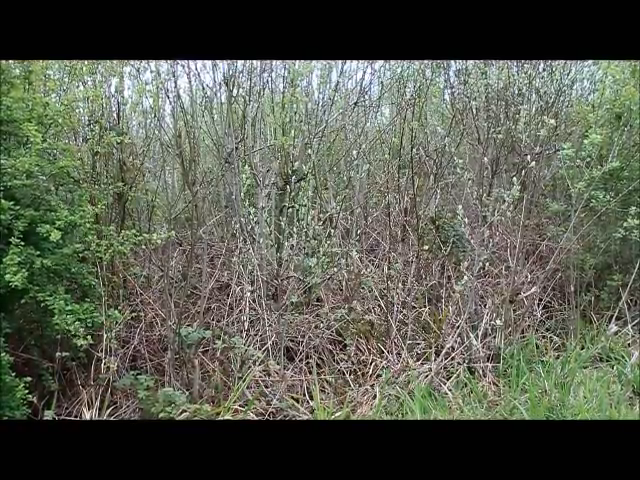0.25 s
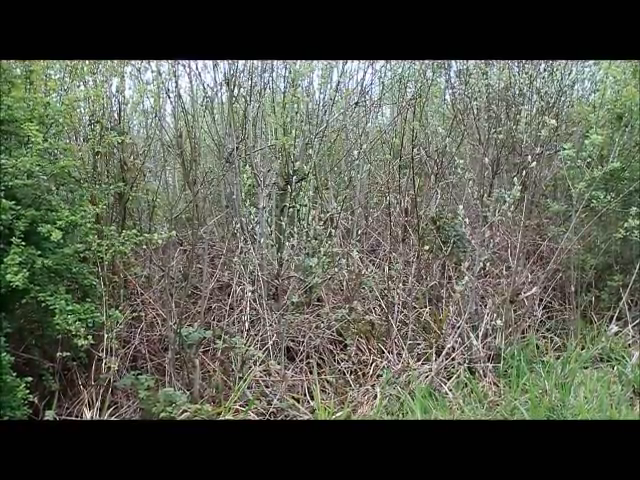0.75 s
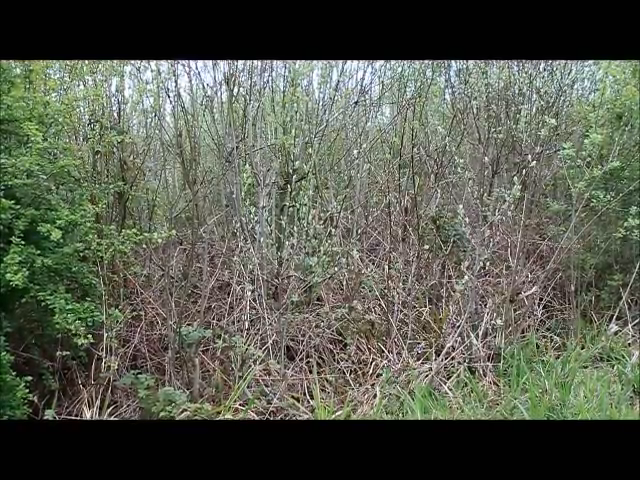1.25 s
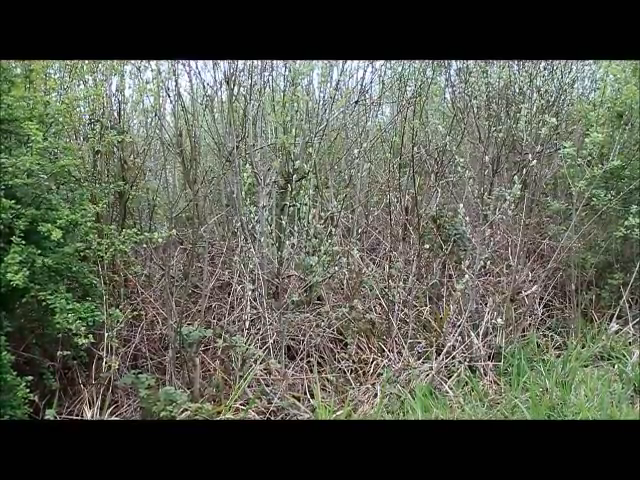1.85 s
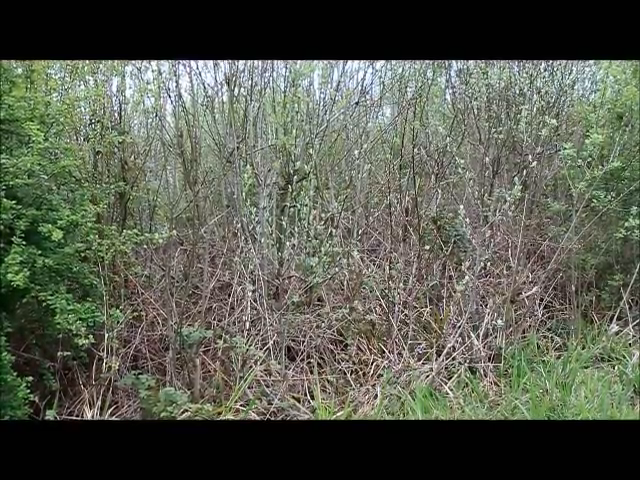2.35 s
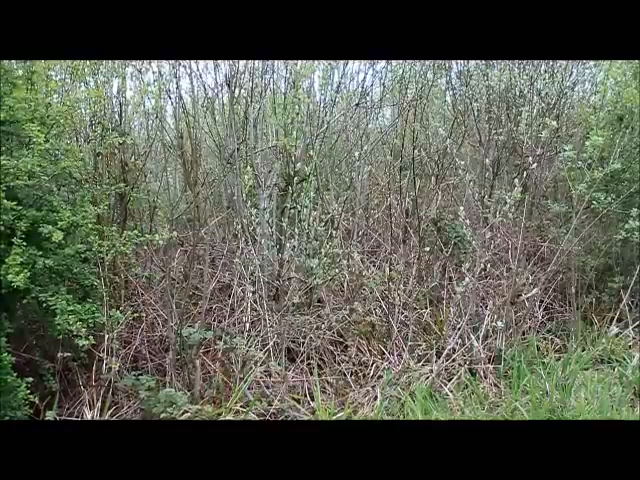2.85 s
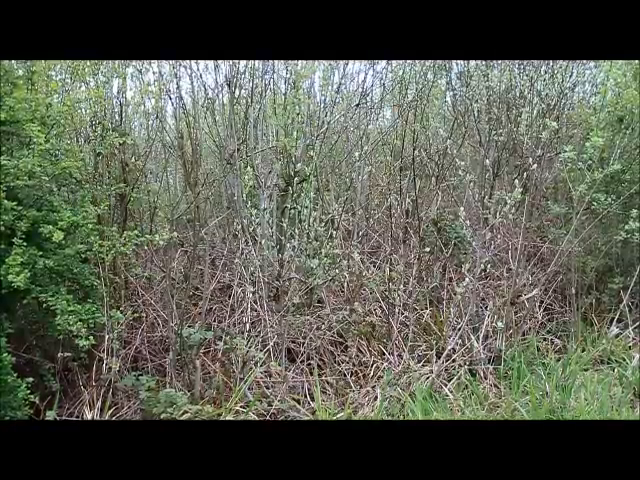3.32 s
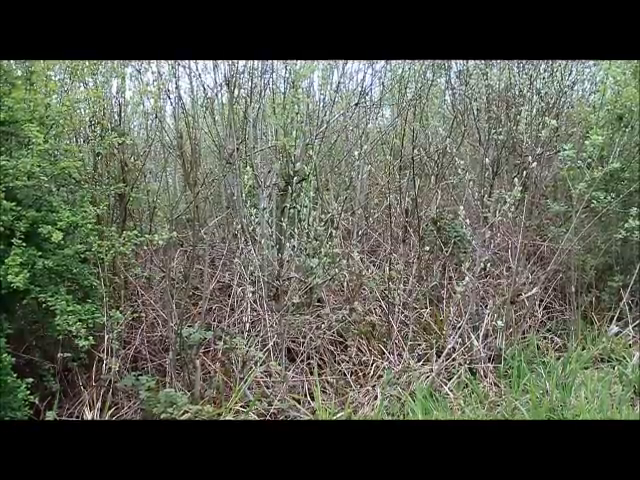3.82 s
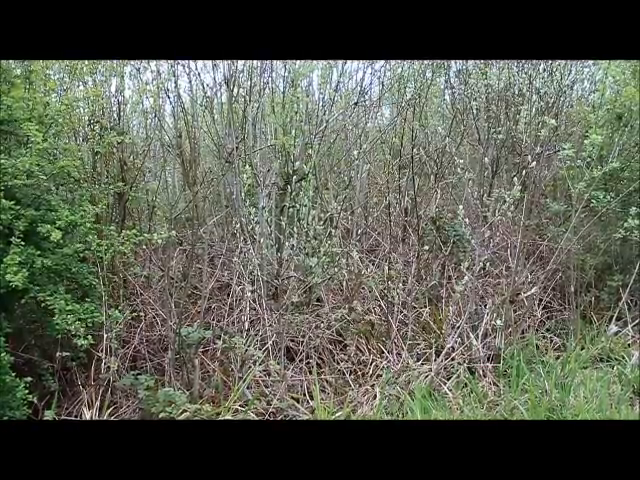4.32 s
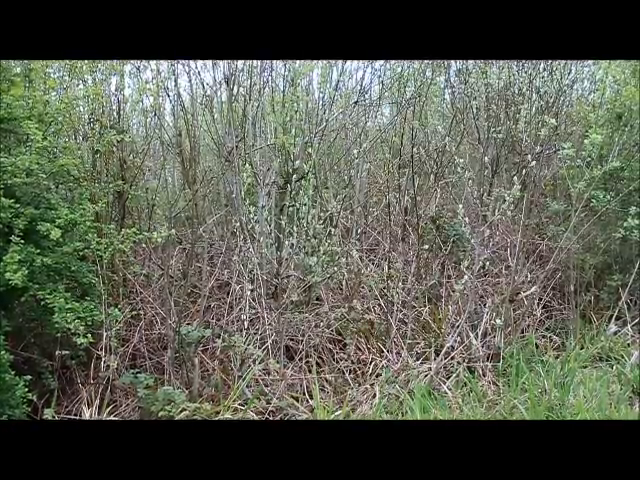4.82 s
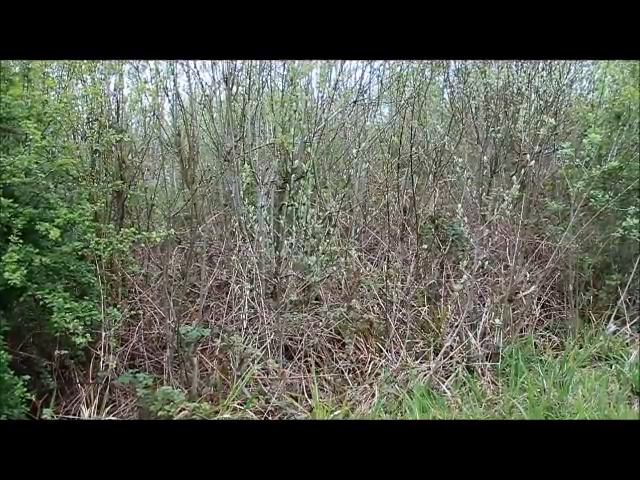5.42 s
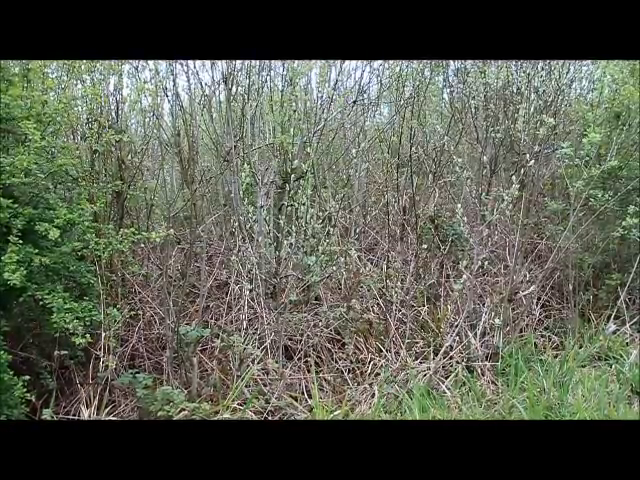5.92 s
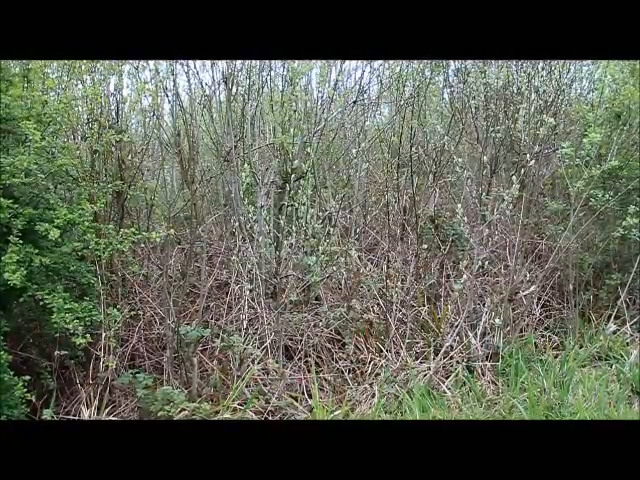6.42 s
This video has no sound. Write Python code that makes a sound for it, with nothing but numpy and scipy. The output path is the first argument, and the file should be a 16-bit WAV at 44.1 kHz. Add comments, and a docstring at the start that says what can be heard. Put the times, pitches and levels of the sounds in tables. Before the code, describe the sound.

Loud, clear nightingale phrases in scrub, from slurs and rasping buzzes to sharp fast chips and soft whistles, with fainter birds behind.

```python
"""Thin opening notes of a nightingale, then seven upslurs alternating with buzzes, thirteen fast
plunging notes and mellow whistles; other birds sing deeper in the wood, over a steady distant
rush and a low hum that fades. Song is near-sines gliding along paths of (s, Hz, dB), buzzes add
pulsed noise, twigs and trunks are random echo taps, and the rush is shaped noise."""
import sys
import numpy as np
from scipy import signal
from scipy.fft import rfft, irfft, next_fast_len
from scipy.io import wavfile
from scipy.ndimage import uniform_filter1d

SR = 44100
rng = np.random.default_rng(int(sys.argv[2]) if len(sys.argv) > 2 else 0)


def log_audio(samples):
    """Write samples as a 16-bit WAV file to the path given in sys.argv[1]."""
    # one column per channel
    frames = np.atleast_2d(samples).T
    # limit to full scale, then quantise
    limited = np.clip(frames, -1, 1)
    pcm = np.round(limited * 32767).astype(np.int16)
    wavfile.write(sys.argv[1], SR, pcm)


N = 294147
TIME = np.arange(N) / SR


def amp(db):
    """Decibels to gain."""
    return 10 ** (np.asarray(db) / 20)


def unit(x):
    """Scales to rms 1."""
    return x / np.sqrt(np.mean(x ** 2) + 1e-20)


def read(points, hz):
    """Interpolates (position, value) rows on a log axis."""
    position, value = np.transpose(points)
    return np.interp(np.log(hz + 1), np.log(position + 1), value)


def level(rows):
    """Turns (s, dB) rows into a gain for every sample."""
    return amp(np.interp(TIME, *np.transpose(rows)))


def add(mix, start_s, sound):
    """Mixes a sound in; a start before zero is moved to zero."""
    part = mix[max(0, round(start_s * SR)):][:len(sound)]
    part += sound[:len(part)]


def beats(first_s, spacing_s, count):
    """The start times of an evenly repeated note."""
    return first_s + spacing_s * np.arange(round(count))


def noise(spectrum):
    """Steady noise of rms 1, coloured by (Hz, dB) rows."""
    size = next_fast_len(N, real=True)
    colour = amp(read(spectrum, np.fft.rfftfreq(size, 1 / SR)))
    white = rfft(rng.standard_normal(size))
    return unit(irfft(white * colour, size)[:N])


def highpass(order, corner_hz):
    """Butterworth high-pass sections."""
    return signal.butter(order, corner_hz, "high", fs=SR, output="sos")


def wander(size, hz):
    """A random line through unit-variance normal knots, hz knots a second."""
    t = np.arange(size) / SR * hz
    knots = rng.standard_normal(int(t[-1]) + 2)
    return np.interp(t, np.arange(len(knots)), knots)


def note(path, jitter=.003, overtone_db=-40):
    """One side of the syrinx: a near sine with a faint octave, gliding along rows of (s, Hz, dB)."""
    s, hz, db = np.transpose(path)
    s = np.sort(s)
    t = s[0] + np.arange(max(int((s[-1] - s[0]) * SR), 64)) / SR
    smooth_samples = min(len(t) // 12, 240)
    pitch_hz = uniform_filter1d(np.interp(t, s, hz), size=smooth_samples, mode="nearest")
    shaken_hz = pitch_hz * (1 + jitter * wander(len(t), 700))
    phase = 2 * np.pi * np.cumsum(shaken_hz) / SR
    overtone = amp(overtone_db) * np.sin(2 * phase) * (pitch_hz < SR / 4)  # none above Nyquist
    edges = np.clip(np.minimum(t - t[0], t[-1] - t) / 0.00027, 0, 1)
    return s[0], amp(np.interp(t, s, db)) * edges * (np.sin(phase) + overtone)


# swell and fade of a whistle: shares of its length; dB at its ends
ATTACK, RELEASE, EDGE_DB = 0.19, 0.22, -7.5


def swell(u):
    """Attack, hold and release of a whistle in dB; u runs from 0 to 1."""
    attack = np.maximum(1 - u / ATTACK, 0)
    release = np.maximum(1 - (1 - u) / RELEASE, 0)
    return EDGE_DB * (attack + release)


def arched(start_s, length_s, first_hz, middle_hz, last_hz, level_db):
    """The path of a whistle whose pitch bends along one parabola."""
    u = np.linspace(0, 1, num=120)
    bow_hz = middle_hz - (first_hz + last_hz) / 2
    hz = first_hz + u * (last_hz - first_hz) + bow_hz * (1 - (2 * u - 1) ** 2)
    return np.transpose([start_s + u * length_s, hz, level_db + swell(u)])


def glide(start_s, length_s, first_hz, last_hz, level_db):
    """The path of a straight glide that swells and fades."""
    u = np.linspace(0, 1, num=9)
    hz = first_hz + u * (last_hz - first_hz)
    return np.transpose([start_s + u * length_s, hz, level_db - 7 * (2 * u - 1) ** 4])


def placed(path, start_s, length_s, level_db):
    """Stretches a (share of length, Hz, dB) path over a length, at a level."""
    return np.array(path) * [length_s, 1, 1] + [start_s, 0, level_db]


def hooked(dip_s, fall_s, arch_s, first_hz, dip_hz, top_hz, fall_db, dip_db, arch_db,
           steepen=1.6, turn=.8, sag_db=-7.5):
    """The path of a whistle that falls into a dip, then lifts into a fading arch."""
    u = np.linspace(0, 1, num=30)
    t = np.concatenate([fall_s * (u - 1), arch_s * u])
    fall_hz = first_hz + (dip_hz - first_hz) * u ** steepen
    arch_hz = dip_hz + (top_hz - dip_hz) * np.sin(np.pi * turn * u ** 0.804)
    times = [-fall_s, -fall_s / 2, -RELEASE * fall_s, 0,
             ATTACK * arch_s, (1 - RELEASE) * arch_s, arch_s]
    levels = [fall_db + EDGE_DB, fall_db, fall_db, dip_db,
              arch_db, arch_db + sag_db, arch_db + sag_db + EDGE_DB]
    return np.transpose([dip_s + t, np.concatenate([fall_hz, arch_hz]), np.interp(t, times, levels)])


# warbled whistle: start_s, length_s, first_hz, middle_hz, last_hz, level_db
WARBLED_WHISTLE = (6.172, 0.19, 2102, 2255.5, 2191, -19.5)


def warbled(rate_hz=50, depth_hz=190, widest_s=6.229, spread_s=0.033, start_db=-11, grow_s=0.12,
            break_db=-13, waver_hz=35):
    """The path of a whistle that shakes and drops out on each upswing, then steadies as it grows loud."""
    s, hz, db = arched(*WARBLED_WHISTLE).T
    phase = 2 * np.pi * rate_hz * (s - widest_s)
    unrest = np.exp(-((s - widest_s) / spread_s) ** 2)
    waver = waver_hz * unit(uniform_filter1d(rng.standard_normal(len(s)), size=9))
    breaks = break_db * unrest * np.maximum(-np.sin(phase), 0)
    growth = start_db * np.maximum(1 - (s - s[0]) / grow_s, 0)
    return np.transpose([s, hz + depth_hz * unrest * np.cos(phase) + waver, db + breaks + growth])


def peaked(top_s, level_db, top_hz=8100, low_hz=3500, rise_s=.010, fall_s=.038, top_db=-16,
           upstroke_db=-7, bend=1.3, shake_hz=122, depth_hz=430, shake_db=3):
    """The path of a thin note that shoots up softly, then slides down louder and shaking more."""
    t = np.linspace(-rise_s, fall_s, num=120)
    early, late = np.maximum(-t / rise_s, 0), np.maximum(t / fall_s, 0)
    height = np.where(t < 0, 1 - early ** 2, (1 - late) ** bend)
    shake = np.minimum(2 * late ** 2, 1) * np.cos(2 * np.pi * shake_hz * t)
    hz = low_hz + (top_hz - low_hz) * height + depth_hz * shake
    db = level_db + top_db * (1 - late) + upstroke_db * early ** 2
    db = db + swell(np.maximum(late, ATTACK)) / 2 + shake_db * shake
    return np.transpose([top_s + t, hz, db])


# arched whistles: start_s, length_s, first_hz, middle_hz, last_hz, level_db
ARCHED_WHISTLES = [(0, 0.016, 4140, 4134, 4100, -26.5), (.398, 0.076, 2200, 2432, 2310, -25.5),
                   (5.413, 0.074, 2240, 2524, 2130, -25.5), (5.692, 0.172, 1700, 1910, 1530, -29.5),
                   (6.242, .112, 1950, 1643, 1860, -40.5), (6.425, 0.12, 2040, 1770, 1633, -29.5)]
# whistles that fall into an arch:
# dip_s, fall_s, arch_s, first_hz, dip_hz, top_hz, fall_db, dip_db, arch_db
HOOKED_WHISTLES = [(4.885, .07, .078, 2664, 2090, 2337, -23.5, -30.5, -19.5),
                   (6.377, 0.0324, .072, 3160, 2870, 3000, -32, -17.5, -18.5)]
# path of one long whistle, rising then sinking: time_s, pitch_hz, level_db
LONG_WHISTLE_PATH = [(5.038, 1880, -36), (5.12, 2080, -27.5), (5.135, 2230, -20), (5.165, 2540, -23.5),
                     (5.185, 2660, -16.5), (5.215, 2703, -18.5), (5.286, 2620, -17.5), (5.298, 2584, -22.5),
                     (5.335, 2350, -32.5)]
# thin peaked opening notes: top_s, level_db
PEAKED_NOTES = [(.568, -21.5), (0.668, -22.5)]


def whistles():
    """Slow nearly pure tones, and the thin peaked notes with stronger pitch jitter."""
    out = np.zeros(N)
    paths = [arched(*row) for row in ARCHED_WHISTLES] + [hooked(*row) for row in HOOKED_WHISTLES]
    for path in paths + [LONG_WHISTLE_PATH, warbled()]:
        add(out, *note(path, jitter=0.0025, overtone_db=-44))
    for row in PEAKED_NOTES:
        add(out, *note(peaked(*row), jitter=0.0155))
    return out


# upslurs: top_s, rise_s, final_leap_s, fall_s, top_hz, throat_resonance_hz, effort_db
UPSLUR_NOTES = [(.838, 0.043, 0.015, 0.013, 2685, 2450, -21), (1.187, 0.04, 0.014, 0.012, 3050, 2390, -19),
                (1.528, 0.049, 0.028, 0.014, 2547, 2390, -20), (1.890, .052, 0.032, 0.013, 3013, 2660, -22),
                (2.277, .049, 0.0194, .015, 2477, 2380, -19), (2.624, 0.041, .013, 0.018, 2355, 2370, -19),
                (3.003, 0.054, 0.028, 0.014, 2710, 2490, -20)]
# throat resonance: pitch / resonance [ratio], gain_db
THROAT_GAIN = [(.59, -7), (.82, -12.5), (.91, -5.5), (1, 2), (1.09, -3.5), (1.3, -12)]
# upslur pitch at onset, just after it, before the leap: pitch_hz
CLIMB_HZ = [1470, 1790, 2000]


def upslurs(onset_db=-11, fade_db=-2.0, overtone_db=-35):
    """Pitch climbs, leaps, snaps down; it flares at the throat resonance, which the faint octave escapes."""
    out = np.zeros(N)
    for top_s, rise_s, leap_s, fall_s, top_hz, throat_hz, effort in UPSLUR_NOTES:
        times = top_s + np.array([-rise_s, -.8 * rise_s, -leap_s, 0, fall_s / 2, fall_s])
        t = np.linspace(times[0], times[-1], num=50)
        hz = np.interp(t, times, [*CLIMB_HZ, top_hz, .85 * top_hz, CLIMB_HZ[0]])
        effort_times = [times[0], times[1], top_s, top_s + fall_s]
        effort_db = effort + np.interp(t, effort_times, [onset_db, 0, 0, fade_db])
        throat_db = read(THROAT_GAIN, hz / throat_hz)
        add(out, *note(np.transpose([t, hz, effort_db + throat_db]), jitter=0.0071))
        octave = np.transpose([t, 2 * hz, effort_db + overtone_db])
        add(out, *note(octave[t < top_s]))
    return out


# buzzes: first_pulse_s, length_s, pulse_count, pitch_hz (mid-buzz), chirp_db, rasp_db
BUZZ_TRAINS = [(0.922, 0.147, 11, 6960, -35.5, -34), (1.275, 0.1, 8, 6990, -34.5, -33.2),
               (1.610, .14, 11, 7200, -31.5, -33.5), (1.982, 0.15, 11, 6960, -38.5, -32),
               (2.360, .110, 9, 7040, -31, -31.5), (2.71, 0.14, 10, 7000, -31.5, -32)]
# rasp noise colour: frequency_hz, relative density [dB per Hz]
RASP_COLOUR = [(2200, -30), (2900, -1), (3900, 2), (4900, -3), (6900, 0), (8500, -20), (10000, -13.5),
               (14500, -18.5)]


def buzzes(half_s=.0023, hurry=.56, ends_db=-3.0, arch=0.04, uneven_db=.5):
    """Pulses of falling chirp over sharp raspy bursts; the first come faster, the outer ones softer."""
    out, bursts = np.zeros(N), np.zeros(N)
    age = np.arange(0, 10, 1 / (half_s * SR))
    burst = age * np.exp(1 - age ** 2 / 2) / 2
    pulse = np.array([(-1, 1.09, -6.5), (0.025, 1.02, -0.5), (1.7, 0.905, -9)])  # half_s, ratio, dB
    for first_s, length_s, pulses, pitch_hz, chirp_db, rasp_db in BUZZ_TRAINS:
        k = np.arange(round(pulses))
        steps = k - hurry * (1 - np.exp(-k))
        for u, chance in zip(steps / steps[-1], rng.standard_normal(len(k))):
            edge = (2 * u - 1) ** 2
            pulse_s = first_s + u * length_s
            loud_db = ends_db * edge ** 4 + uneven_db * chance
            chirp = pulse * [half_s, pitch_hz * (1 - arch * edge), 1]
            add(out, *note(chirp + [pulse_s, 0, chirp_db + loud_db], jitter=0.022))
            add(bursts, pulse_s - half_s, amp(rasp_db + loud_db) * burst)
    return out + bursts * noise(RASP_COLOUR)


def slurred(start_s, length_s, shelf_hz, shelf_db, flick_db, start_hz=5150, settle_s=.005,
            sag_hz_per_s=1200, easy_hz=3450, sink_per_s=16, flick_s=0.0173, flick_hz=700,
            attack_s=0.0015, head_s=0.0071, head_db=(-22, -26), lead_db=14, end_db=-13):
    """The path of a slur: hard strike and drop, soft shelf (sinking faster if high), loud flick down."""
    t = np.linspace(0, length_s, num=120)
    flick = np.maximum(1 - (length_s - t) / flick_s, 0)
    sag = sag_hz_per_s + sink_per_s * max(shelf_hz - easy_hz, 0)
    drop_hz = (start_hz - shelf_hz) * np.exp(-t / settle_s)
    hz = shelf_hz + drop_hz - sag * t - flick_hz * flick ** 2
    strike_db = np.minimum(head_db, flick_db + lead_db)  # a very soft flick softens the strike too
    times = [0, attack_s, head_s, 2 * head_s,
             length_s - 1.14 * flick_s, length_s - 0.47 * flick_s, length_s]
    levels = [shelf_db, *strike_db, shelf_db, shelf_db, flick_db, flick_db + end_db]
    return np.transpose([start_s + t, hz, np.interp(t, times, levels)])


# plunging notes: time_s, squeak_db, plunge_db, slur_length_s, shelf_hz, shelf_db, flick_db
PLUNGE_NOTES = [(3.102, -34, -21, 0.071, 3354, -34, -28), (3.248, -32.5, -19.5, 0.073, 3420, -35, -30),
                (3.397, -26.5, -16.5, 0.063, 3720, -38, -24), (3.534, -23, -16.5, 0.071, 3490, -34, -29),
                (3.679, -23, -17, 0.067, 3234, -31, -28), (3.821, -26.5, -22.5, 0.071, 3296, -33.5, -27.5),
                (3.966, -26.5, -18, 0.077, 3280, -34.5, -32), (4.104, -26, -21, 0.075, 3460, -29.5, -23.5),
                (4.264, -26, -17.5, .069, 3920, -38.5, -25.5), (4.417, -27, -21, 0.069, 3540, -40, -26.5),
                (4.569, -30.5, -19, 0.058, 3600, -37, -40), (4.731, -29.5, -20, 0.078, 3760, -33.5, -23.5),
                (4.899, -28, -17.5, 0.072, 3720, -35.5, -28)]
# squeak path: share of length [0-1], pitch_hz (before tension), relative_db
SQUEAK_PATH = [(0, 11800, -19), (.3, 13250, -9), (.55, 13650, -3.5), (.77, 13250, 0.5), (1, 9000, -10.5)]
# plunge path: share of length [0-1], pitch_hz, relative_db
PLUNGE_PATH = [(0, 7000, -23), (.22, 5550, -1), (.42, 4450, -3.5), (.62, 3350, -10.5), (1, 2050, -30)]


def plunges(squeak_s=.022, squeak_lead_s=.0205, lead_s=0.0024, plunge_s=.0095, handover_s=.005,
            undertone_db=-18):
    """A very high squeak breaks into a steep plunge; the other side of the syrinx slurs and flicks off."""
    out = np.zeros(N)
    for time_s, squeak_db, plunge_db, slur_s, shelf_hz, shelf_db, flick_db in PLUNGE_NOTES:
        tension = 1 + 0.00373 * (squeak_db + 25.5)  # a harder squeak is a little higher
        squeak = placed(SQUEAK_PATH, time_s - squeak_lead_s, squeak_s, squeak_db)
        add(out, *note(squeak * [1, tension, 1], jitter=0.005))
        plunge = placed(PLUNGE_PATH, time_s - lead_s, plunge_s, plunge_db)
        add(out, *note(plunge, jitter=0.035, overtone_db=-23))
        slur = slurred(time_s + handover_s, slur_s - handover_s, shelf_hz, shelf_db, flick_db)
        add(out, *note(slur, jitter=0.016, overtone_db=-32.5))
        add(out, *note(slur * [1, .5, 1] + [0, 0, undertone_db]))  # weak line an octave below
    return out


def branch(x, delay_s=.00126, echo_db=-9, corner_hz=3400):
    """One close reflection of the treble: steep glides and buzzes cross its peaks and notches."""
    treble = signal.sosfiltfilt(highpass(2, corner_hz), x)
    echo = np.zeros(N)
    add(echo, delay_s, amp(echo_db) * treble)
    return echo


def scatter(x, t60, delay_s):
    """Echoes from twigs and trunks: dense random taps, each band dying at its own (Hz, s) T60."""
    taps = rng.standard_normal(SR) * (rng.random(SR) < .15)
    hz, t, bands = signal.stft(taps, SR, nperseg=256)
    decay = amp(-60 * t / read(t60, hz)[:, None])
    tail = signal.istft(bands * decay, SR, nperseg=256)[1]
    tail = tail * np.clip(np.arange(len(tail)) / SR / delay_s - .5, 0, 1)
    return signal.fftconvolve(x, tail / np.linalg.norm(tail))[:N]


def twigs(x, corner_hz=4500):
    """Thin twigs close to the bird throw back mostly the short waves."""
    treble = signal.sosfilt(highpass(2, corner_hz), x)
    return scatter(treble, [(3000, 0.2), (13000, 0.16)], delay_s=0.0021)


# glides deeper in the wood: start_s, length_s, first_hz, last_hz, level_db (before flutter)
FAR_GLIDES = [(.347, 0.097, 4550, 4355, -35), (0.734, 0.065, 4960, 4040, -36),
              (3.913, 0.024, 4400, 5300, -42), (4.275, 0.072, 2704, 2753, -38),
              (4.456, .11, 3450, 3640, -41), (4.602, 0.038, 4350, 3950, -37), (4.612, .13, 1740, 1440, -37),
              (4.827, 0.06, 4190, 3690, -32.5), (4.989, .14, 3200, 3330, -34),
              (5.254, 0.04, 4015, 4200, -35), (5.33, .2, 3130, 3010, -42), (6.282, 0.048, 2550, 3150, -42)]
# small arched chips: start_s, pitch_hz (at onset), level_db (before flutter)
FAR_CHIPS = [(.282, 3920, -38), (.316, 4390, -35), (.541, 3930, -38), (.569, 3960, -36),
             (.638, 3900, -36.5), (.905, 4460, -37), (.946, 3620, -35), (5.723, 3040, -38),
             (5.95, 2220, -38), (6.107, 2230, -40.5), (6.563, 2370, -42)]
# soft falling notes: first_s, spacing_s, count
FAR_DROPS = (.062, .1375, 6)
# pips: first_s, spacing_s (negative: all but the first pile up at 0 s), count (rounded),
# pitch_hz, level_db (before flutter)
FAR_PIPS = (.08, -0.1, 5.5, 3168, -47)
# thin rising chirps: first_s, spacing_s, count, level_db (before flutter)
FAR_RISES = (0, 0.4, 3, -42)
# remote song, heard as echo: start_s, length_s, first_hz, last_hz, level_db (before the echo)
REMOTE_SONG = [(4.615, 0.77, 6690, 5950, -52.5), (5.199, 0.65, 5220, 4600, -54),
               (5.63, .03, 5500, 3200, -42.5), (5.665, .048, 3010, 2210, -38),
               (5.998, 0.56, 4690, 4570, -51.5), (6, 0.021, 6900, 5600, -51), (6.312, .02, 6900, 5400, -50)]


def far_birds(chip_s=.018, chip_end=.86, drop_s=.027, drop_hz=(3600, 1900), drop_db=(-44, -34),
              rise_s=.017, rise_hz=(4400, 6500)):
    """Short glides, chips, drops, pips and rises, with remote phrases that arrive only as echoes."""
    out, remote = np.zeros(N), np.zeros(N)
    paths = [glide(*row) for row in FAR_GLIDES]
    paths += [arched(s, chip_s, hz, hz, chip_end * hz, db) for s, hz, db in FAR_CHIPS]
    growing_db = np.linspace(*drop_db, num=9)
    paths += [glide(s, drop_s, *drop_hz, growing_db) for s in beats(*FAR_DROPS)]
    *pip_beat, pip_hz, pip_db = FAR_PIPS
    paths += [glide(s, chip_s, pip_hz, pip_hz, pip_db) for s in beats(*pip_beat)]
    *rise_beat, rise_db = FAR_RISES
    for s in beats(*rise_beat):  # each rise is doubled: a blurred one and a clear one
        add(remote, *note(glide(s - 2 * rise_s, rise_s, *rise_hz, rise_db)))
        paths.append(glide(s, rise_s, *rise_hz, rise_db))
    for path in paths:
        add(out, *note(path, jitter=0.013))
    for row in REMOTE_SONG:
        add(remote, *note(glide(*row), jitter=0.041))
    return out + scatter(remote, [(3000, 0.23)], delay_s=.002)


# echo decay of the wood: frequency_hz, t60_s
WOOD_DECAY = [(1500, 0.88), (3000, 0.71), (7000, 0.44)]
# chorus colour, for chirps and noise: frequency_hz, relative_db
CHORUS_COLOUR = [(1700, -15), (2300, -10.5), (3100, 1.5), (4500, -1.5), (6300, 1.5), (7500, -8.5)]
# chorus level: time_s, level_db
CHORUS_LEVEL = [(0, -45), (.8, -46.5), (1.3, -56), (2.8, -51.5), (3.5, -45.5), (4.8, -44), (5.4, -52)]


def chorus(count=400):
    """Many remote birds: quick random chirps, almost lost in the echo of the wood and in noise."""
    chirps = np.zeros(N)
    for when, span, pitch, slope, size in rng.random((count, 5)):
        first_hz = 2200 * 2.7 ** pitch
        last_hz = first_hz * (.72 + .4 * slope)
        db = read(CHORUS_COLOUR, first_hz) + 6 * size
        path = glide(when * N / SR, 0.01223 + 0.025 * span, first_hz, last_hz, db)
        add(chirps, *note(path, jitter=.02))
    echo = unit(scatter(chirps, WOOD_DECAY, delay_s=0.0066))
    return level(CHORUS_LEVEL) * unit(unit(chirps) + amp(5) * echo + noise(CHORUS_COLOUR))


# distant rush colour: frequency_hz, relative density [dB per Hz]
RUSH_COLOUR = [(24, -35), (40, 3), (87, -2.5), (266, -8.5), (820, -1), (1080, -2), (1490, -10),
               (3060, -18.5), (4000, -34), (7160, -27), (15500, -37)]
# distant rush level: time_s, level_db
RUSH_LEVEL = [(0, -39.5), (6.67, -42)]
# high hiss level before its wander: time_s, level_db
HISS_LEVEL = [(0, -71), (1.4, -62.5), (4.5, -58), (5.2, -75)]
# fade shared by hum and rumble, before their own gains: time_s, level_db
HUM_LEVEL = [(0, -44.5), (1.2, -51.5), (2.6, -54.5), (6.67, -65.5)]


def background(hum_hz=129, bump_db=-39):
    """Shaped-noise rush and faint hiss, a fading engine-like hum with rumble, and one soft low bump."""
    out = noise(RUSH_COLOUR) * level(RUSH_LEVEL)
    hiss = noise([(6000, -12), (11500, -2.5), (15500, -13.0)])
    out += hiss * level(HISS_LEVEL) * amp(2 * wander(N, 4.9))
    hum_phase = 2 * np.pi * np.cumsum(hum_hz + 2.56 * wander(N, 11)) / SR
    hum = np.sqrt(2) * np.sin(hum_phase) * amp(2 * wander(N, 12))
    rumble = noise([(35, -30), (70, -3.0), (170, -14.5), (1200, -42.5)])
    out += level(HUM_LEVEL) * (amp(-1.5) * hum + amp(-5) * rumble)
    add(out, *note(glide(2.75, 0.1, 125, 180, bump_db), jitter=0.088, overtone_db=-10))
    return out


def scene(flutter_db=2.5, flutter_hz=90):
    """The near singer is mostly direct; the far birds flutter and carry more echo."""
    near = whistles() + upslurs() + buzzes() + plunges()
    far = far_birds() * amp(flutter_db * wander(N, flutter_hz))
    wood = scatter(amp(-15.5) * near + amp(-8.0) * far, WOOD_DECAY, delay_s=0.017)
    song = near + branch(near) + far + amp(-2.0) * twigs(near + far) + wood
    return (song + chorus() + background())[None]


def record(dry, bass_hz=47, edge_hz=15900):
    """The microphone's bass roll-off and the recorder's band limit."""
    thin = signal.sosfilt(highpass(4, bass_hz), dry)
    band_limit = signal.firwin(511, edge_hz, window=("kaiser", 9), fs=SR)
    return signal.oaconvolve(thin, band_limit[None], "same")


dry = scene()
out = record(dry)
log_audio(out)
```